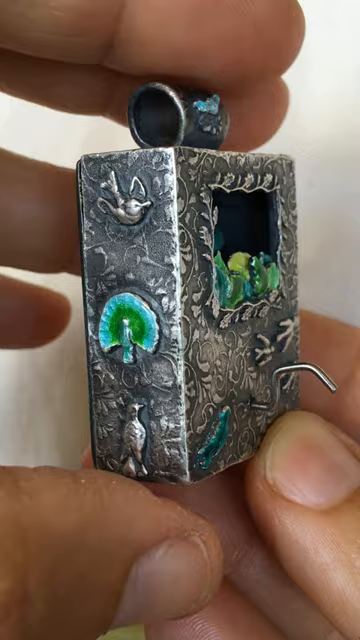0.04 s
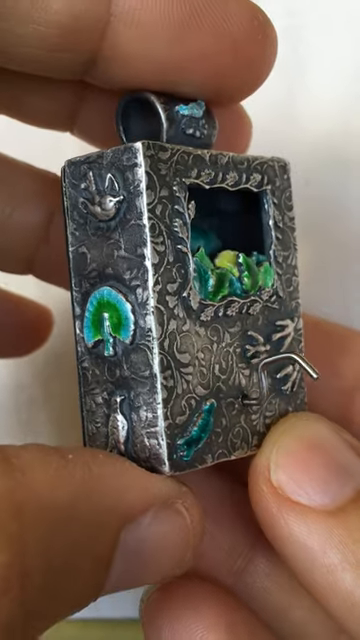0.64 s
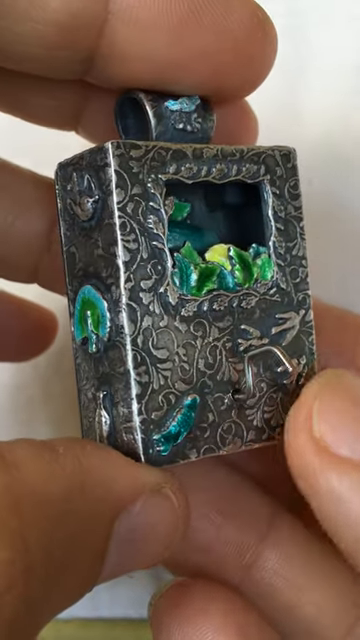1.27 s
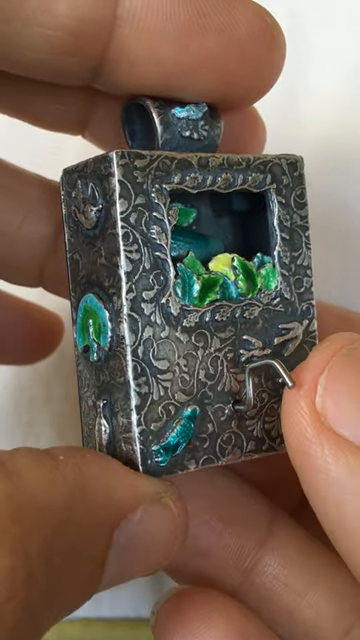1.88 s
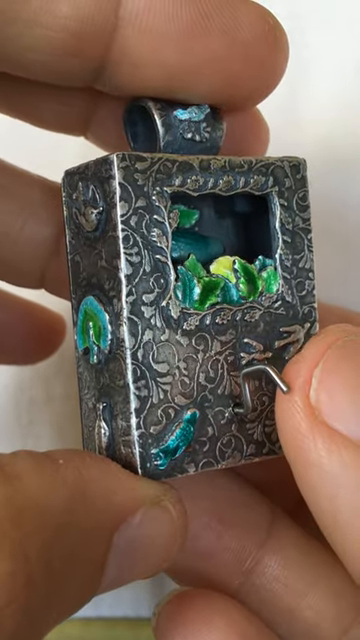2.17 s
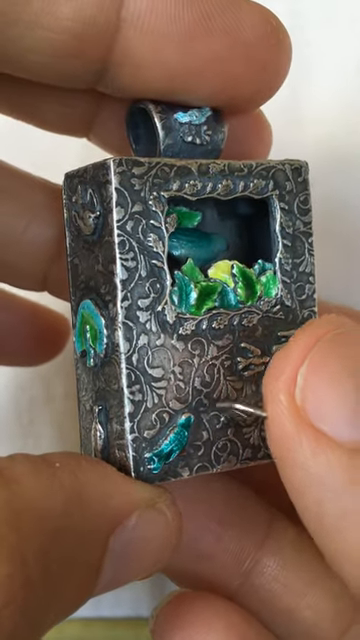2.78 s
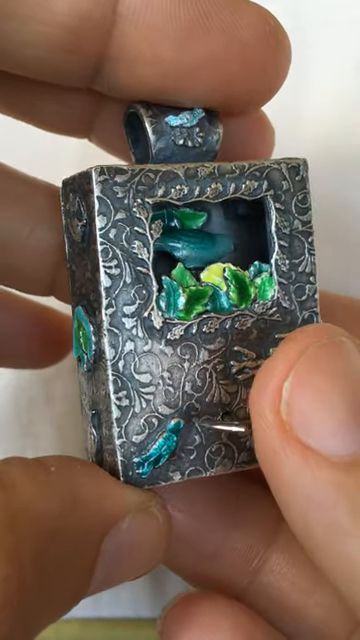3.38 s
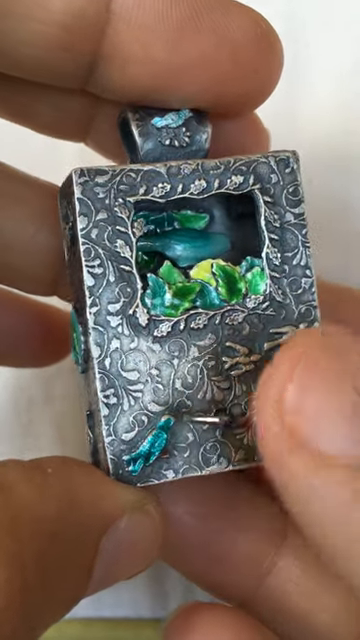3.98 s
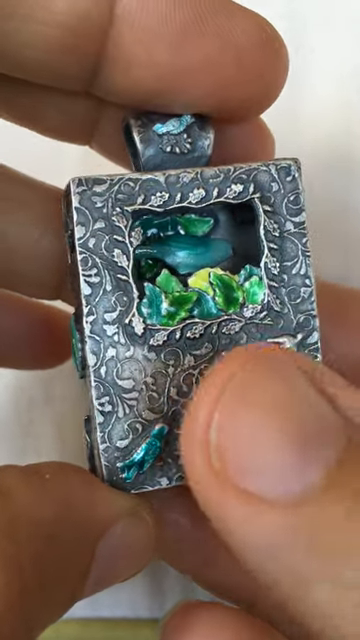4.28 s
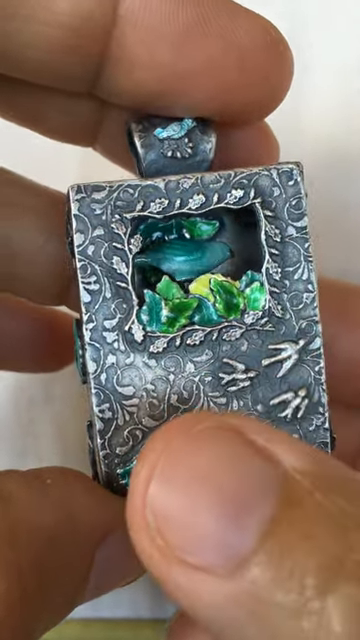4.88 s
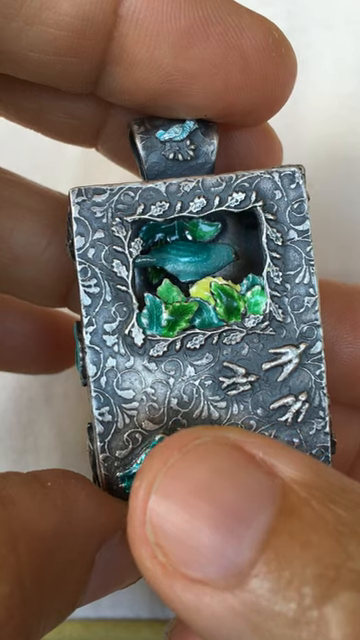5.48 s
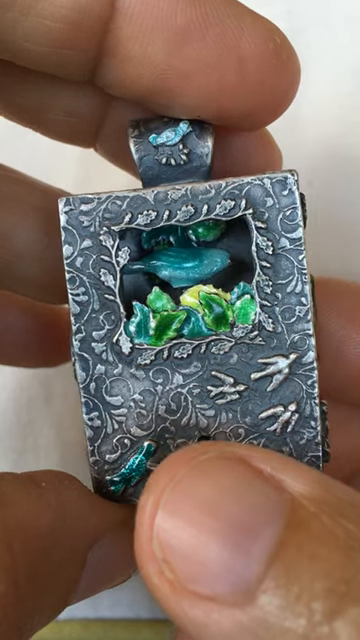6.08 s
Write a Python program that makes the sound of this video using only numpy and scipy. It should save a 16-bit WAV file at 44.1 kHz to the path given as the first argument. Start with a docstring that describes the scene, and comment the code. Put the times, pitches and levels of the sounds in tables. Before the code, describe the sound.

Hands rub and bump a microphone in a quiet room while a tiny wire crank ticks faintly and clicks once against metal.

```python
"""Cranking a silver pendant

Fingers turn the wire crank of a small silver box pendant close to a microphone, in a quiet room.
The hands rub and bump the microphone's housing, which passes them on as low rumble and soft thuds.
Skin whispers over the metal, the crank ticks faintly in its bearing, and once it drops against
the case with a sharp click."""
import sys
import numpy as np
from scipy import signal
from scipy.fft import rfft, irfft
from scipy.io import wavfile
from scipy.ndimage import uniform_filter1d

SR = 44100
rng = np.random.default_rng(int(sys.argv[2]) if len(sys.argv) > 2 else 0)


def store_pcm(level_fs):
    """Save levels as 16-bit WAV."""
    pcm = np.round(np.clip(level_fs, -1, 1) * 32767).astype(np.int16)
    wavfile.write(sys.argv[1], SR, np.atleast_2d(pcm).T)


N = 275184
BAND_LIMIT_HZ = 15750
LEAD_S = 0.06  # a soft push starts this long before its peak


def amp(db):
    """Decibels to gain."""
    return 10 ** (np.asarray(db) / 20)


def unit_rms(x):
    """Scales to rms 1."""
    return x / np.sqrt(np.mean(x ** 2) + 1e-20)


def gain_at(colour, hz):
    """Reads an EQ curve of (freq_hz, gain_db) points on a log-frequency axis, as gain."""
    freq_hz, gain_db = np.transpose(colour)
    return amp(np.interp(np.log(hz + 1), np.log(freq_hz + 1), gain_db))


def noise(colour):
    """Noise of rms 1, shaped by an EQ curve."""
    hz = np.fft.rfftfreq(N, 1 / SR)
    return unit_rms(irfft(rfft(rng.standard_normal(N)) * gain_at(colour, hz), N))


def add(mix, start_s, sound):
    """Lays a sound into the mix."""
    part = mix[max(round(start_s * SR), 0):][:len(sound)]
    part += sound[:len(part)]


# low murmur of the room's air: freq_hz, gain_db
MURMUR_COLOUR = [(20, -39), (45, -5.5), (65, -3), (105, 0), (170, -9.5), (235, -9), (275, -15), (350, -14),
                 (500, -22), (650, -21.5), (1000, -33), (2200, -81)]
# steady hiss: freq_hz, gain_db
HISS_COLOUR = [(400, -21.5), (1000, -0.5), (1700, -0.5), (2800, -5), (3400, -3), (4800, -8), (5600, -6),
               (7800, -10.5), (9600, -11), (10400, -16.5), (11400, -13.5), (15500, -18.5)]


def room(murmur_db=-62.5, hiss_db=-72.5):
    """Room tone: air murmurs low under a smooth hiss."""
    return amp(murmur_db) * noise(MURMUR_COLOUR) + amp(hiss_db) * noise(HISS_COLOUR)


# fingertips letting go: start_s, level_db, decay_s
FINGER_TICKS = [(0.047, -64, 0.0044), (0.543, -67, 0.0096), (.622, -68.5, 0.032), (1.182, -72, .010),
                (1.3681, -58.5, 0.0023), (1.875, -69.5, 0.014), (2.251, -69, 0.012), (2.325, -65, 0.004),
                (2.955, -64, 0.0044), (3.895, -65.5, 0.0097), (4.54, -66.5, 0.012), (4.585, -71.5, 0.11),
                (4.984, -61.5, 0.0033), (5.570, -62.5, 0.0035), (5.645, -67, .006), (6.081, -62.5, 0.0029)]
# their dry midrange: freq_hz, gain_db
TICK_COLOUR = [(300, -38), (1000, 3), (1700, 1), (3300, -2.5), (5000, -12), (15000, -38)]
# skin sliding over the metal: centre_s, level_db, half_length_s
SKIN_SLIDES = [(1.11, -75, 0.022), (1.30, -75.5, .045), (4.276, -78, 0.039), (4.4, -78.5, 0.066),
               (4.567, -78, 0.13), (4.91, -78, 0.022), (4.99, -79, 0.068), (5.176, -74.5, 0.017),
               (5.255, -83, .025), (6.196, -82, 0.16)]
# its airy whisper: freq_hz, gain_db
WHISPER_COLOUR = [(1000, -22), (4000, -2), (8500, -2.5), (9600, -1), (10400, -8), (12000, -3), (15500, -6)]


def fingertips():
    """Dry ticks where skin lets go, and a fine whisper where it slides."""
    t = np.arange(N) / SR
    ticks = sum(amp(db) * (t >= s) * np.exp(-abs(t - s) / decay) for s, db, decay in FINGER_TICKS)
    slides = sum(amp(db) * np.exp(-((t - s) / width) ** 2) for s, db, width in SKIN_SLIDES)
    return ticks * noise(TICK_COLOUR) + slides * noise(WHISPER_COLOUR)


# the wire shifting in its bearing: start_s, level_db, pitch_hz, decay_s
WIRE_PINGS = [(1.288, -67, 2550, 0.014), (1.313, -48.5, 3700, 0.0016), (1.320, -69, 3570, 0.011),
              (1.332, -68, 3580, 0.0038), (3.289, -61.5, 3900, 0.0024)]


def wire_pings(detune=0.024, attack_s=0.00043):
    """The bent wire pings faintly in two close bending modes, one either side of the pitch."""
    out, t = np.zeros(N), np.arange(SR // 8) / SR
    for start_s, level_db, pitch_hz, decay_s in WIRE_PINGS:
        upper = np.sin(2 * np.pi * pitch_hz * (1 + detune) * t)
        lower = np.sin(2 * np.pi * pitch_hz * (1 - detune) * t)
        envelope = (1 - np.exp(-t / attack_s)) * np.exp(-t / decay_s)
        add(out, start_s, amp(level_db) * (upper + 0.5 * lower) * envelope)
    return out


def stroke(start_s, hold_s, rise_s):
    """Pressure of one stroke: it builds up to start_s, holds and lets go."""
    t = np.arange(N) / SR - start_s
    release_s = 0.0064 + 0.47 * rise_s  # slow to build, slow to let go
    return np.exp(np.minimum(t, 0) / rise_s - np.maximum(t - hold_s, 0) / release_s)


def friction(colour, evenness=0.56):
    """Rubbing noise of rms 1: steady contact keeps its strength from straying far."""
    raw = noise(colour)
    strength = np.sqrt(uniform_filter1d(abs(signal.hilbert(raw)) ** 2, size=900) + 1e-6)
    return unit_rms(raw / strength ** evenness)


# strokes of the hand over the housing: start_s, hold_s, level_db, grip_db (relative to level), rise_s
HAND_STROKES = [(1.478, 0.29, -59.5, -16, 0.089), (2.006, .11, -34, -18.5, 0.014),
                (2.225, 0.072, -41.5, -9.5, 0.035), (2.399, 0.026, -36.5, -10.5, 0.011),
                (2.466, 0.052, -37, -10.5, 0.022), (2.552, 0.04, -48, -21, .015),
                (2.699, 0.028, -54, -16, 0.017), (2.984, 0.12, -38.5, -11, .048),
                (3.29, .08, -62, -25, 0.045), (3.50, 0.033, -48.5, -23, 0.043),
                (3.586, 0.19, -54.5, -31, .04), (4.098, 0.033, -55.5, -22, 0.031),
                (4.517, 0.027, -32, -2, 0.026), (4.641, 0.031, -33, -17, 0.028),
                (4.861, 0.061, -38.5, -10, 0.0084), (4.994, 0.035, -31.5, -16, 0.039),
                (5.104, 0.13, -32, -6, 0.015), (5.269, 0.05, -38.5, -10.5, 0.02),
                (5.372, .055, -38.5, -11, 0.015), (5.489, 0.097, -31.5, -9, 0.014),
                (5.618, 0.043, -38, -2, 0.011), (5.717, 0.034, -34, -4.5, 0.014),
                (5.819, 0.032, -33, -6.5, 0.022), (5.91, 0.033, -53.5, -25, .04),
                (6.07, 0.026, -40.5, -11, 0.034), (6.198, 0.041, -38, -10, 0.062)]
# deep rumble of dragging skin: freq_hz, gain_db
RUMBLE_COLOUR = [(15, -47), (25, -28), (40, -3.5), (55, 1), (68, -0.5), (88, -1), (115, -8.5), (170, -19.5),
                 (240, -32), (500, -52), (1500, -110)]
# judder of gripping skin: freq_hz, gain_db
GRIP_COLOUR = [(60, -28), (130, 6.5), (205, 4.5), (280, -6.5), (340, -11), (430, -23), (485, -26.5),
               (700, -38), (1200, -47.5), (2500, -110)]


def hand_drag(judder_db=-1):
    """Skin rumbles over the housing; where it grips, it snags and judders an octave or two higher."""
    pressure, grip = np.zeros((2, N))
    for start_s, hold_s, level_db, grip_db, rise_s in HAND_STROKES:
        envelope = amp(level_db) * stroke(start_s, hold_s, rise_s)
        pressure = np.maximum(pressure, envelope)
        grip = np.maximum(grip, amp(grip_db) * envelope)
    rumble = pressure * friction(RUMBLE_COLOUR)
    judder = amp(judder_db) * grip * friction(GRIP_COLOUR)
    return rumble + judder + snags(grip)


def snags(grip, per_second=45, mean_db=-2, spread_db=3.5, count=1000):
    """Gripping skin catches at uneven intervals, each time with a small thud scaled by the grip."""
    out, catch = np.zeros(N), thud(contact_s=0.0014, low_cut_hz=110)
    times_s = (np.arange(count) + rng.random(count)) / per_second
    gains_db = mean_db + spread_db * rng.standard_normal(count)
    for hit_s, gain_db in zip(times_s, gains_db):
        if LEAD_S < hit_s < N / SR:
            add(out, hit_s - LEAD_S, grip[int(hit_s * SR)] * amp(gain_db) * catch)
    return out


def body_response(colour, size=8192):
    """Minimum-phase impulse response: a body rings only after the blow."""
    log_gain = np.log(gain_at(colour, abs(np.fft.fftfreq(size, 1 / SR))))
    spectrum = np.exp(np.conj(signal.hilbert(log_gain)))
    return np.fft.ifft(spectrum).real[:size // 2]


# boxy tone of the microphone's housing: freq_hz, gain_db
HOUSING_COLOUR = [(15, -39), (25, -31), (40, -8), (68, 0), (95, 1), (130, 1), (215, -2.5), (290, -3.5),
                  (420, -3), (485, -0.5), (545, -4.5), (600, 2.5), (700, 0.5), (850, -7.5), (1500, -16)]


def thud(contact_s, low_cut_hz):
    """Soft flesh gives a rounded push that rings the housing. Peak 1."""
    t = np.arange(-LEAD_S, LEAD_S, 1 / SR)
    push = 1 / np.cosh(t / contact_s)
    ring = signal.fftconvolve(push, body_response(HOUSING_COLOUR))
    ring = signal.sosfilt(signal.butter(2, low_cut_hz, "highpass", fs=SR, output="sos"), ring)
    return ring / abs(ring).max()


# knocks on the housing: hit_s, peak_db, contact_s, low_cut_hz
HAND_BUMPS = [(2.064, -29.5, .0011, 60), (2.102, -28.5, 0.0012, 130), (2.181, -34, 0.0011, 89.5),
              (2.25, -20, 0.0021, 83), (2.291, -29, 0.0011, 70), (2.504, -27, 0.0023, 40),
              (2.642, -36.5, 0.0035, 50.4), (2.735, -41.5, 0.0017, 90), (3.002, -37.5, 0.0013, 180),
              (3.054, -30, 0.0037, 49.5), (4.5046, -19.5, 0.0012, 198), (4.530, -23.5, 0.001, 70),
              (4.545, -20.5, .0012, 49.4), (4.795, -39.5, 0.0018, 60), (4.912, -26.5, 0.0015, 180),
              (4.979, -30, 0.001, 160), (4.999, -24.5, 0.00097, 50), (5.112, -23.5, 0.00091, 91),
              (5.1494, -24.5, 0.00087, 80), (5.2118, -16, 0.00063, 35), (5.2213, -17.5, 0.00045, 110),
              (5.493, -21.5, 0.0019, 120), (5.517, -19.5, 0.00072, 70.6), (5.652, -26.5, .00083, 130),
              (5.729, -29.5, 0.00091, 178), (5.841, -25, .0014, 79.6), (6.148, -30.5, 0.00098, 110),
              (6.198, -26, .00093, 70)]


def hand_bumps():
    """The hand knocks the housing: short contact is bright, a glancing touch carries little bass."""
    out = np.zeros(N)
    for hit_s, peak_db, contact_s, low_cut_hz in HAND_BUMPS:
        add(out, hit_s - LEAD_S, amp(peak_db) * thud(contact_s, low_cut_hz))
    return out


# the crank striking the case, heard as one click: start_s, level_db, brightness_hz
CRANK_HITS = [(4.78663, -56.5, 20000), (4.78713, -46, 16000), (4.78871, -46, 3000)]
# ring of the silver case: pitch_hz, gain_db, t60_s
CASE_MODES = [(3560, 0.5, 0.019), (3680, -4, 0.013), (4170, -10, 0.021), (4759, 0, 0.033),
              (5309, -11, 0.0099), (7420, -5, 0.01), (7730, 0.5, 0.013), (8900, -3, 0.013),
              (9200, -16, 0.03), (9683, -22, 0.066), (11500, -13.5, 0.019), (12819, -3, 0.009),
              (13410, -13, 0.044), (13867, -25, 0.016)]


def crank_click(scrape_db=-12, scrape_decay_s=0.00055):
    """The wire chatters on the case; fingers damp the silver, so its modes die quickly."""
    out, t = np.zeros(N), np.arange(SR // 10) / SR
    scrape_colour = [(2500, -35), (3400, -3), (6000, 13), (9500, 9),
                     (10400, -18), (12500, -2), (15500, -13)]  # freq_hz, gain_db
    grains = noise(scrape_colour)[:len(CRANK_HITS) * len(t)].reshape(-1, len(t))
    for (start_s, level_db, brightness_hz), grain in zip(CRANK_HITS, grains):
        ring = np.zeros(len(t))
        for pitch_hz, gain_db, t60_s in CASE_MODES:
            rolloff = 1 / np.hypot(1, (pitch_hz / brightness_hz) ** 4)
            ring += rolloff * amp(gain_db - 60 * t / t60_s) * np.sin(2 * np.pi * pitch_hz * t)
        scrape_gain = amp(scrape_db) * brightness_hz / BAND_LIMIT_HZ  # brighter hits scrape more
        scrape = scrape_gain * grain * np.exp(-t / scrape_decay_s)
        add(out, start_s, amp(level_db) * (ring + scrape))
    # so small a body radiates almost nothing below its first mode
    return signal.sosfilt(signal.butter(8, 3000, "highpass", fs=SR, output="sos"), out)


def scene():
    """Everything is close and dry, on one microphone."""
    handling = hand_bumps() + hand_drag()
    pendant = crank_click() + wire_pings() + fingertips()
    return (handling + pendant + room())[None]


def record(dry):
    """A steep low-pass takes off the very top."""
    lowpass = signal.firwin(1023, BAND_LIMIT_HZ, window=("kaiser", 9), fs=SR)
    return signal.oaconvolve(dry, lowpass[None], "same")


dry = scene()
out = record(dry)
store_pcm(out)
```